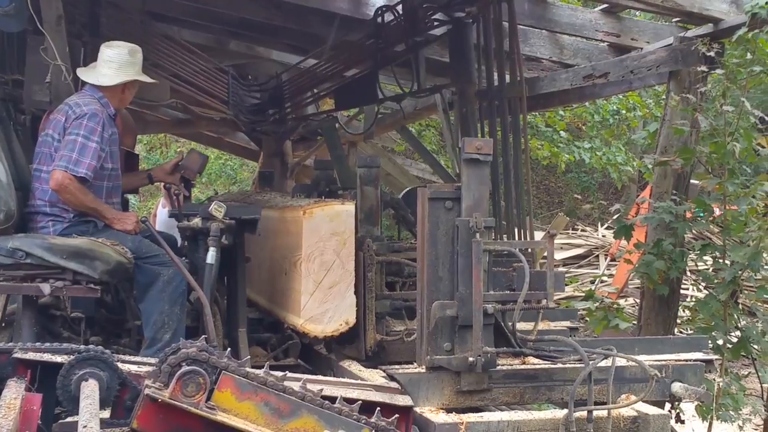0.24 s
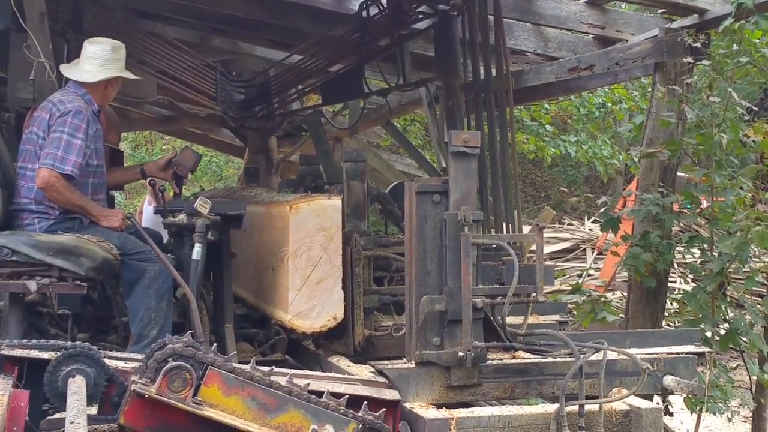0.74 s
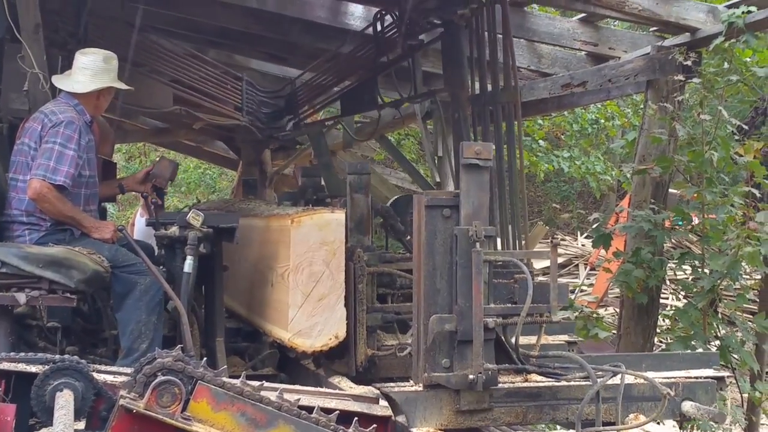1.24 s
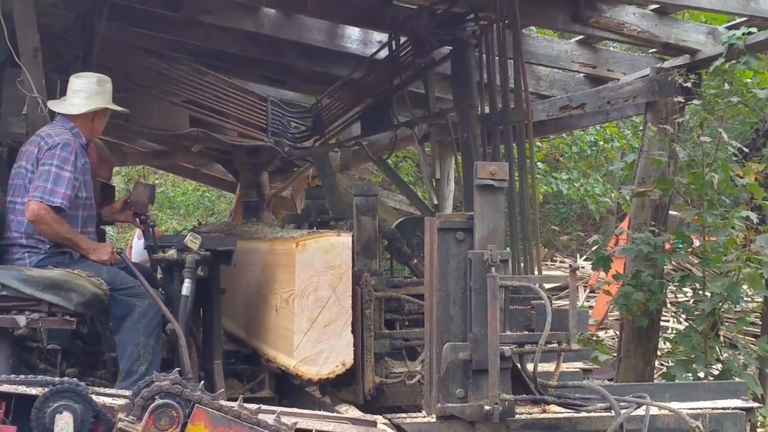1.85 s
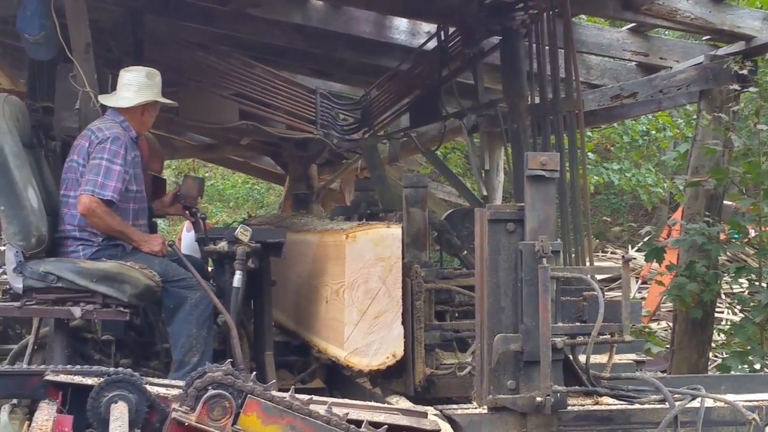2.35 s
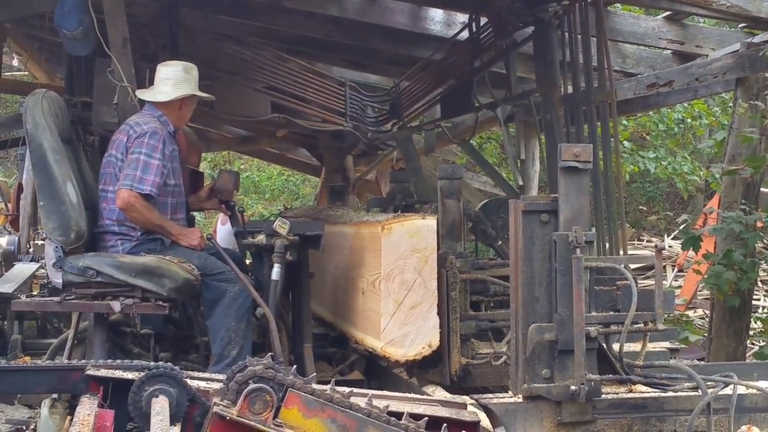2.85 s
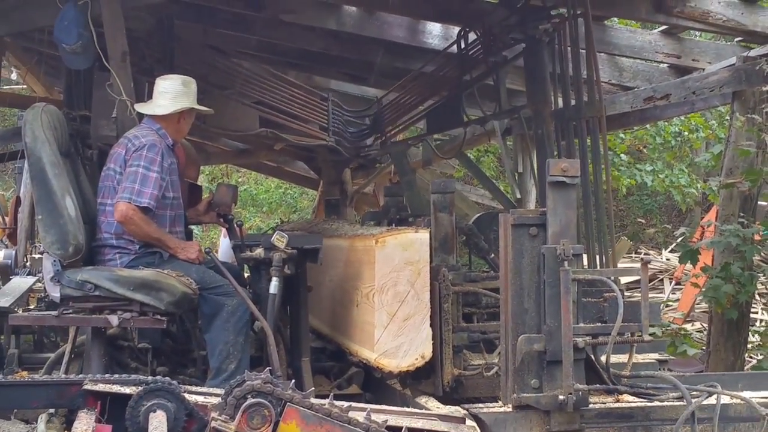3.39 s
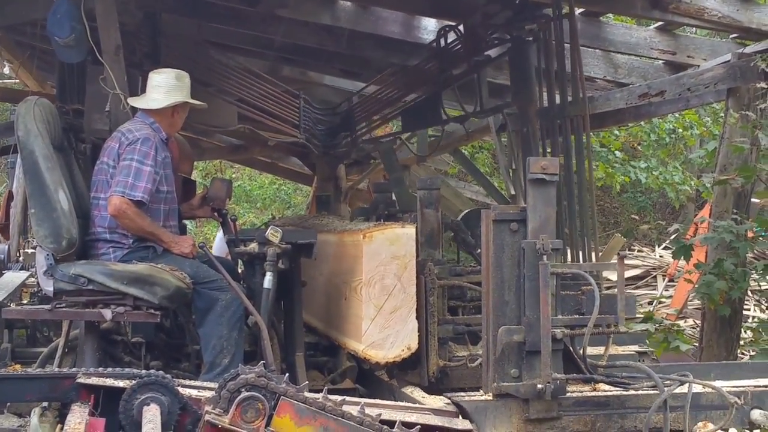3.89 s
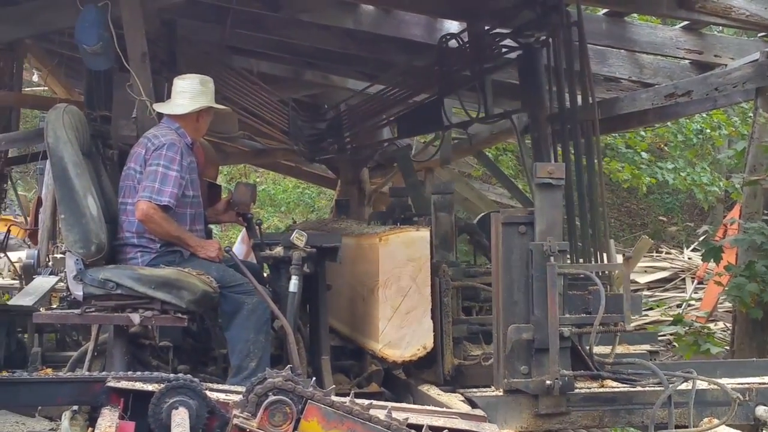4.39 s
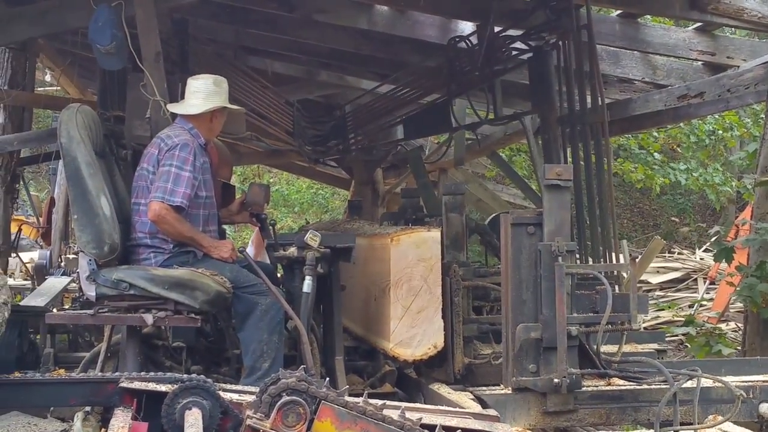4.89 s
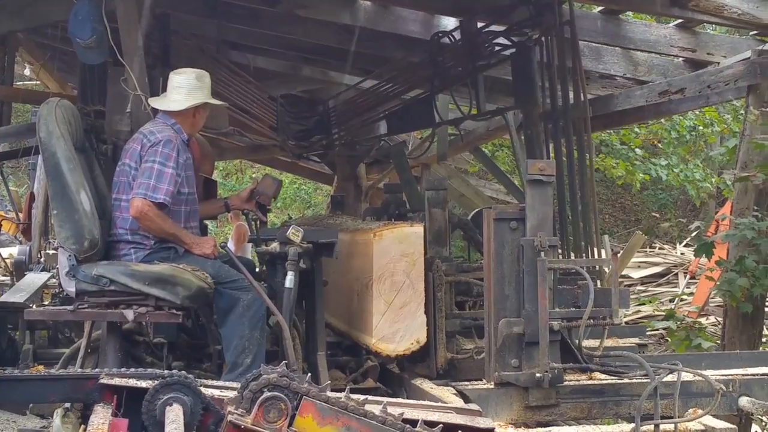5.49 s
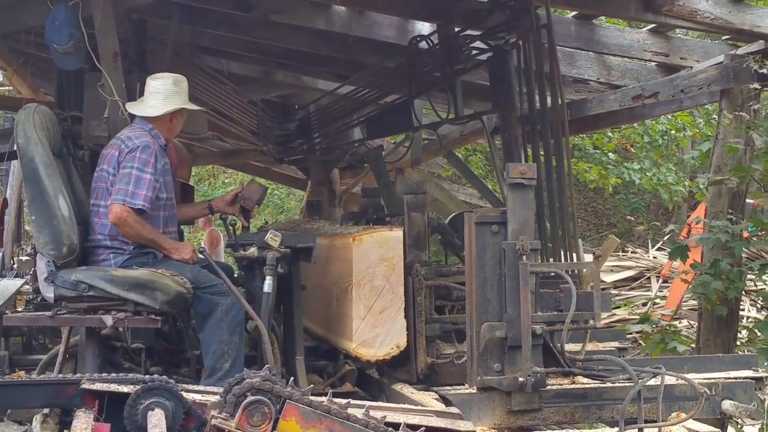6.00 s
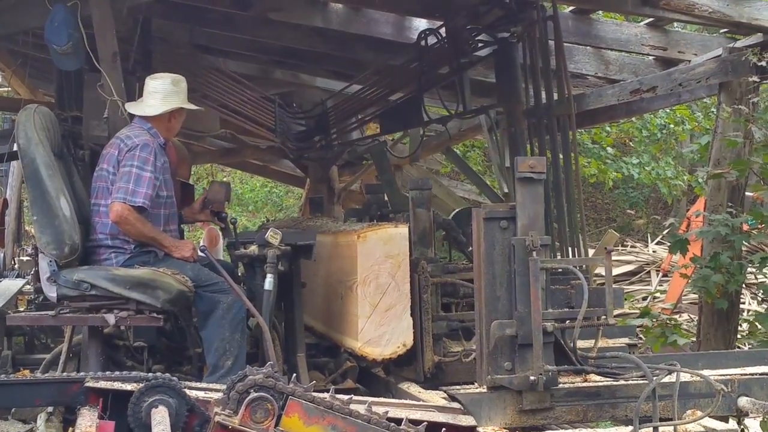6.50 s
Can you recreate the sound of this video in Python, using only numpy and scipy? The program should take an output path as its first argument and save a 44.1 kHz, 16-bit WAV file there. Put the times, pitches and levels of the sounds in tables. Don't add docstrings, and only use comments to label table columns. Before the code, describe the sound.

A loud diesel drone fills the whole 6.6 seconds, deep and buzzing through an open exhaust, with blower whine, ringing gears, frame resonance, rattling clatter and a steady low pump hum. At first the engine is shaking off an earlier cut, with faint rasping. From 0.6 s the circular blade's bright hiss rises, strongest from about 0.9 to 2.1 s, with a short rough knot near 1.1 s. A lighter push follows, then a longer growing one from 2.7 to 4 s as the pitch eases slightly. At 4.3 s a hard entry bursts in with fine spray and coarse tearing; the engine sags about a semitone and knocks, and wavering squeals near 2 kHz chirp until 5 s. A light hiss fades after 5.4 s while the pitch climbs back, and a final push swells from 5.9 s. The hiss throbs around nine times a second. Close outdoor stereo phone pickup, rounded on the loudest peaks.

```python
import sys
import numpy as np
from scipy import signal
from scipy.fft import rfft, irfft
from scipy.io import wavfile
from scipy.ndimage import uniform_filter1d

SR = 44100
rng = np.random.default_rng(int(sys.argv[2]) if len(sys.argv) > 2 else 0)


def pcm_store(signal):
    levels = np.round(np.clip(np.atleast_2d(signal), -1, 1) * 32767)
    wavfile.write(sys.argv[1], SR, levels.astype(np.int16).T)


def gain_from_db(level_db):
    decades = np.asarray(level_db, float) / 20
    return 10 ** decades


N = 297234
T_S = np.arange(N) / SR


def rms1(x):
    return x / np.sqrt(np.mean(x ** 2))


def shape(x, points, share=1):
    hz, db = np.transpose(points)
    log_hz = np.log(np.arange(N // 2 + 1) * SR / N + 1)
    gain_db = share * np.interp(log_hz, np.log(hz), db)
    return irfft(rfft(x) * gain_from_db(gain_db), N)


def walk(rate_hz):
    at = np.arange(N) * rate_hz / SR
    knots = rng.standard_normal(int(at[-1]) + 2)
    k = at.astype(int)
    blend = np.sin(np.pi / 2 * (at - k)) ** 2
    return 1.246 * (knots[k] + (knots[k + 1] - knots[k]) * blend)


def line(phase, db):
    offset = np.array([[0], [rng.uniform(0, 2 * np.pi)]])
    return np.sqrt(2) * gain_from_db(db) * np.cos(phase + offset)


def noise_pair(points):
    return shape(rng.standard_normal((2, N)), points)


def bands(points, flicker_db, rate_hz):
    spectrum = rfft(noise_pair(points))
    octave = np.log2(np.arange(N // 2 + 1) * SR / N + 1)
    lowest, highest = np.floor(np.log2(points[0][0])), np.log2(points[-1][0])
    out = 0
    for k in np.arange(lowest, highest + 1):
        window = np.clip(1 - abs(octave - k), 0, 1)
        out = out + gain_from_db(flicker_db * walk(rate_hz)) * irfft(spectrum * window, N)
    return rms1(out)


def swells(rows, release_s):
    power = 0
    for s, length_s, rise_s, first_db, last_db in rows:
        hold = gain_from_db(np.interp(T_S, [s, s + length_s], [first_db, last_db]))
        rise = np.clip((T_S - s) / rise_s, 0, 1)
        fall = np.exp(-2 * np.maximum(T_S - s - length_s, 0) / release_s)
        power = power + hold ** 2 * rise ** 2 * fall
    return np.sqrt(power)


# (time [s], speed [Hz])
CRANK_SPEED = [(.15, 27.94), (.4, 28.16), (.65, 28.25), (.9, 28.18), (1.4, 27.86), (2.2, 27.85),
               (2.6, 27.9), (3.0, 27.77), (3.7, 27.68), (4.0, 27.55), (4.32, 27.51), (4.6, 26.69),
               (4.85, 26.33), (5.1, 26.25), (5.43, 26.31), (5.92, 27.74), (6.15, 27.93), (6.6, 28.08)]


def crank_speed():
    s, hz = np.transpose(CRANK_SPEED)
    return uniform_filter1d(np.interp(T_S, s, hz), size=3000)


SWEEP_HZ = [26.26, 26.45, 26.7, 26.95, 27.3, 27.55, 27.75, 27.9, 28.2]
RESONANCE = {"6th": (.01, [-18, -19, -20, -21, -18.5, -17, -16.5, -16.5, -16]),
             "9th": (.11, [-17.5, -14.5, -12.5, -10.5, -13, -13, -12, -13, -12]),
             "24th": (0.17, [-34.5, -31, -30.5, -29, -22.5, -26, -31, -39, -36]),
             "27th": (0.23, [-30.5, -36, -34, -42, -67, -42, -51, -36, -45.5]),
             "30th": (.01, [-36, -39, -40, -46, -39, -50, -45, -45, -34]),
             "36th": (0.035, [-32.5, -51, -42, -47, -34, -32, -40.5, -39, -39.5]),
             "clatter": (0.017, [-24, -24.5, -25, -27, -26, -25, -26, -28, -28.5])}


def strong_db(hz, name):
    lag_s, db = RESONANCE[name]
    lagged_hz = np.interp(np.arange(N) - lag_s * SR, np.arange(N), hz)
    return np.interp(lagged_hz, SWEEP_HZ, db)


LOAD_SPEEDS_HZ = [26.35, 27.6, 27.95]


def by_load(hz, values):
    return np.interp(hz, LOAD_SPEEDS_HZ, values)


# (multiple of crank, level free [dB], level pulling [dB], level sagging [dB])
WEAK_ORDERS = [(3, -45.0, -45.0, -41.0), (4, -43.0, -42.0, -38.0), (5, -49.0, -50.0, -42.0),
               (7, -34.0, -33, -30), (8, -43.0, -43.0, -48.0), (10, -30.0, -30.0, -29.0),
               (11, -22.0, -21.0, -25.0), (12, -24.0, -23.0, -27.0), (13, -40.0, -37.0, -29.0),
               (14, -44.0, -44.0, -38.0), (15, -38.0, -35.0, -30.5), (18, -41.0, -41.0, -48.0),
               (19, -42.0, -45.0, -53.0), (20, -42.0, -39.0, -38.0), (21, -43.0, -36.0, -48.0),
               (22, -44.0, -48.0, -48.0), (23, -45.0, -40.0, -34.0), (25, -43.0, -45.0, -36.0),
               (26, -41.0, -40.0, -36.0), (28, -42.0, -39.0, -41.0), (29, -43.0, -39.0, -44.0),
               (31, -43.0, -40.0, -48.0), (32, -41.0, -36.0, -48.0), (33, -44.0, -39.0, -38.0),
               (37, -52.0, -46.0, -49.0), (38, -41.0, -45.0, -35.0), (39, -48.0, -53.0, -35.0),
               (41, -49.0, -49.0, -45.0), (42, -46.0, -46.0, -55.0), (45, -48.0, -45.0, -46.0)]
# (time [s], length [s], rise [s], first level [dB], last level [dB])
PIPE_HOLD = [(3.1, 1.2, 0.44, -35.5, -31)]


def exhaust(turn, blade, hz, pull):
    db24 = strong_db(hz, "24th") + 10.5 * pull
    free36_db = strong_db(hz, "36th") + 2.8 * walk(3.41)
    db36 = 20 * np.log10(np.hypot(gain_from_db(free36_db), swells(PIPE_HOLD, release_s=.06)))
    turn = turn + 0.0063 * np.sin(blade)
    sag = by_load(hz, [1, 0, 0])
    slip = -.12 * sag
    out = line(9 * turn, strong_db(hz, "9th"))
    out += line(6 * (turn + slip), strong_db(hz, "6th"))
    out += line(24 * turn + 2.25, db24)
    out += line(36 * turn + 0.34 * walk(4), db36)

    for k, free_db, pulling_db, sagging_db in WEAK_ORDERS:
        start = 2.2 * np.sign(np.round((k - 9.5) / 2))
        if k % 3 == 0:
            start = start + k * slip
        if k > 15:
            start = start + (1 - .72 * sag) * rng.uniform(-np.pi, np.pi)
        wander = .012 * k * (1 - .7 * sag) * walk(5)
        flicker_db = np.clip(k / 8 - 1.3, .15, 1.7) * walk(2.5)
        out += line(k * turn + start + wander, by_load(hz, [sagging_db, pulling_db, free_db]) + flicker_db)

    for k in range(46, 78):
        out += line(k * turn + 2.63 * walk(3), -56.5 + 5 * (k % 3 == 0) + 4 * walk(1.59))
    return out


# (time [s], length [s], rise [s], first level [dB], last level [dB])
SHOVES = [
    (.62, 0.34, 0.33, -35, -34),
    (.9, 1.225, .22, -31, -31.5),
    (2.1, 0.48, .05, -39, -40.5),
    (2.68, 1.385, 0.091, -36, -31.5),
    (4.05, .2, .05, -38, -36.5),
    (4.298, .82, 0.032, -27, -35.5),
    (5.35, 0.48, .1, -37, -41),
    (5.9, 0.8, 0.33, -30.5, -33),
]
# (frequency [Hz], level [dB per Hz])
HISS_COLOUR = [(900, -42), (2000, -2), (2650, -1.5), (3100, -2), (4200, 0.5), (5800, -2.5), (6800, -1),
               (7700, -12.5), (8600, -72)]
# (frequency [Hz], level [dB per Hz])
FIZZ_COLOUR = [(6000, -49), (7600, -0.5), (10500, -1.5), (11700, -2.5), (12800, -8), (15700, -12)]


def hiss():
    catch_s, catch_width_s = 4.285, 0.011
    catch = gain_from_db(-2.5 * np.exp(-((T_S - catch_s) / catch_width_s) ** 2))
    feed = catch * np.hypot(gain_from_db(-39.5), swells(SHOVES, release_s=0.052))
    chips = gain_from_db(0.54 * walk(900))
    return feed * chips * (bands(HISS_COLOUR, 0.65, 12) + gain_from_db(-13) * bands(FIZZ_COLOUR, 0.66, 12))


# (time [s], length [s], rise [s], first level [dB], last level [dB])
HARD_GRAIN = [
    (0, .6, .01, -42, -44),
    (1.07, .26, .06, -36, -34.5),
    (2.78, .25, .1, -38, -38),
    (4.3, .85, .2, -35, -38),
]
# (frequency [Hz], level [dB per Hz])
TEAR_COLOUR = [(1800, -17), (2700, 1), (3100, 5), (4000, 0.5), (5000, -7.5), (6500, -38)]


def rasp():
    gain = np.hypot(gain_from_db(-42), swells(HARD_GRAIN, release_s=0.2))
    return gain * gain_from_db(1.0 * walk(70)) * bands(TEAR_COLOUR, 0.72, 22)


def saw(blade):
    throb = gain_from_db(.5 * np.cos(blade) + .15 * np.cos(2 * blade) + .3 * walk(14))
    return throb * (rasp() + hiss())


# (time [s], length [s], pitch [Hz], slide [Hz/s], level [dB])
SQUEALS = [
    (4.33, .11, 2080, -1900, -33),
    (4.44, .065, 1890, 3000, -34.5),
    (4.52, .09, 2020, -600, -43),
    (4.62, .05, 1880, 700, -38),
    (4.75, .06, 2040, -300, -41),
    (4.835, .145, 2010, 100, -33.5),
]


def squeal():
    pitch_hz = 0
    for s, length_s, hz, slide, db in SQUEALS:
        pitch_hz = np.where(T_S >= s, hz + slide * np.clip(T_S - s, 0, length_s), pitch_hz)
    tones = 0
    for ratio, db, flutter_db in [(1, 0, 2.2), (1.125, -6, 3), (1.2, -10, 4), (1.27, -13, 3)]:
        mode_hz = ratio * pitch_hz * (1 + .012 * walk(220))
        tones = tones + line(np.cumsum(2 * np.pi * mode_hz / SR), db + flutter_db * walk(45))
    rows = [(s, length_s, 0.011, db + 2, db + 1.5) for s, length_s, hz, slide, db in SQUEALS]
    return swells(rows, release_s=0.028) * tones


def bite():
    s = T_S - 4.302
    decay = (s > 0) * np.exp(-np.maximum(s, 0) / .08)
    return gain_from_db(-41) * decay * rms1(noise_pair([(5000, -30), (8000, -3), (12000, -1), (15700, -7)]))


# (multiple of blower, multiple of crank, level [dB])
BLOWER_TONES = [(1, -3, -34.5), (1, -1, -30.5), (1, 0, -52), (1, 1, -36.5), (1, 3, -50.5), (2, 0, -37.5),
                (3, 0, -46)]


def blower(turn, hz):
    blower_ratio = 11.7
    sag_db = by_load(hz, [-3, 0, 0])
    out = 0
    for b, c, db in BLOWER_TONES:
        phase = (b * blower_ratio + c) * turn + 1.1 * walk(3)
        out = out + line(phase, db + sag_db + 0.3 * walk(6.3))
    return out


# (time [s], length [s], rise [s], first level [dB], last level [dB])
BRACE_SINGS = [(.6, 3.4, 0.48, -37.5, -33.5)]


def frame(turn, hz):
    gain27 = gain_from_db(strong_db(hz, "27th"))
    gain30 = np.hypot(gain_from_db(strong_db(hz, "30th")), swells(BRACE_SINGS, release_s=.15))
    out = 0
    for k, gain in ((27, gain27), (30, gain30)):
        out = out + gain * line(k * turn + 2.2 + 0.41 * walk(4.7), 1.3 * walk(3.8))
    return out


# (multiple of crank, level [dB], phase wander [rad])
GEAR_MESH = [(78, -45, 1.0), (80, -42.5, .4), (91.3, -52, .8)]
MESH_LOAD_DB = [-6, -2.5, -1.5]
# (frequency [Hz], level [dB per Hz])
CASE_RING = [(1900, -43), (2120, -26), (2200, 5.5), (2260, -6), (2500, -1.5), (2620, -35.5)]


def gears(turn, hz, pull):
    load_db = by_load(hz, MESH_LOAD_DB) + 2.5 * pull
    mesh = 0
    for k, db, wander_rad in GEAR_MESH:
        mesh = mesh + line(k * turn + wander_rad * walk(12), db + load_db + 1.3 * walk(6))
    blows = 1 + 0.17 * np.cos(2 * turn) + 0.16 * np.cos(6 * turn)
    return mesh + gain_from_db(-42.5 + 1.0 * walk(8.5)) * blows * rms1(noise_pair(CASE_RING))


# (frequency [Hz], level [dB per Hz])
CLATTER_COLOUR = [(25, -39), (60, -15), (110, -2), (260, -2), (340, 4.5), (460, -8), (720, 1), (950, -5),
                  (1150, -14.5), (1450, -3), (1750, -13), (2200, -9), (2700, -19.5), (4500, -36)]


def clatter(turn, hz, pull):
    db = strong_db(hz, "clatter") + 2.5 * pull
    gate = 1 + 0.034 * np.cos(2 * turn) + 0.048 * np.cos(6 * turn + 0.54)
    gate = gate + by_load(hz, [.3, 0, 0]) * np.cos(turn)
    return gain_from_db(db) * gate * bands(CLATTER_COLOUR, 0.39, 9)


def pump():
    pump_hz, pump_db = 184.8, -28.5
    return line(2 * np.pi * pump_hz * T_S + .5 * walk(2.16), pump_db + .8 * walk(5.4))


# (frequency [Hz], side minus mid [dB])
SIDE_SHARE = [(30, -19), (90, -22), (140, -38), (350, -30), (480, -14), (800, -12), (1100, -1), (2000, 0),
              (15000, 0)]
# (frequency [Hz], left minus right [dB])
PORT_TILT = [(200, 2.6), (260, 2.2), (310, -1.2), (420, -2.5), (560, 5), (1020, -6), (1500, 0), (2200, 3),
             (4400, -3), (8000, 3), (12000, -1)]


def ports(mid, side):
    lag_samples = 6
    lead = shape(lag_samples * np.gradient(mid), [(180, -2), (270, -5), (400, -1), (600, -9), (900, -12),
                                                  (1100, -2), (1500, -8), (2200, -30)])
    side = shape(side, SIDE_SHARE) + lead
    left = shape(mid + side, PORT_TILT, share=1 / 2)
    right = shape(mid - side, PORT_TILT, share=-1 / 2)
    return np.array([left, right])


def scene():
    hz = crank_speed()
    turn = np.cumsum(2 * np.pi * hz / SR)
    blade = .312 * turn
    pull = np.exp(-(T_S / 0.36) ** 2)
    engine = exhaust(turn, blade, hz, pull)
    cutting = saw(blade) + squeal() + bite()
    machinery = blower(turn, hz) + frame(turn, hz) + gears(turn, hz, pull) + clatter(turn, hz, pull)
    mid, side = engine + cutting + machinery + pump()
    return ports(mid, side)


def top_cut(x):
    return signal.sosfilt(signal.butter(12, 15640, fs=SR, output="sos"), x)


def record(dry):
    mix = np.tanh(0.88 * dry) / 0.82
    return top_cut(mix)


dry = scene()
out = record(dry)
pcm_store(out)
```